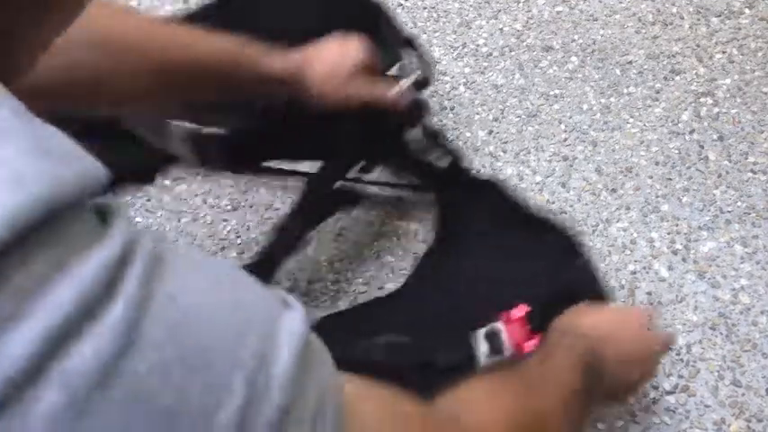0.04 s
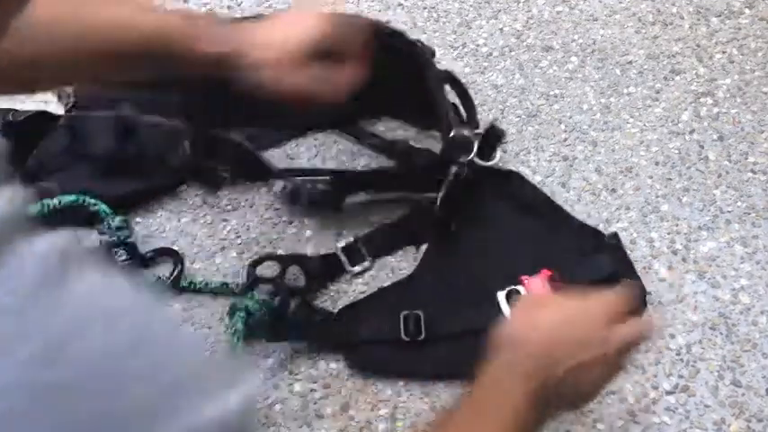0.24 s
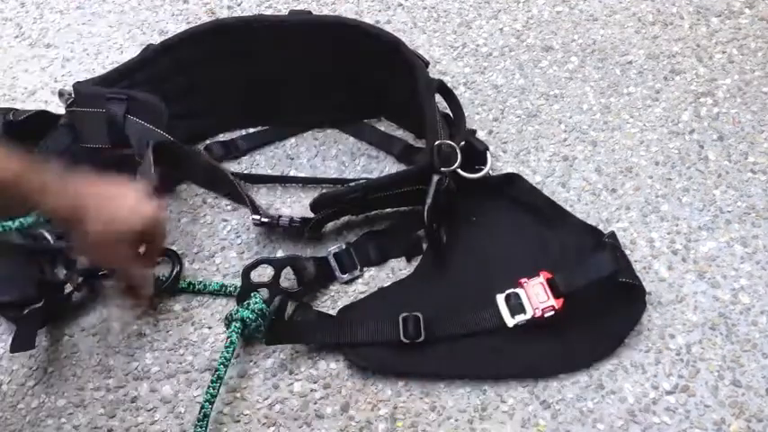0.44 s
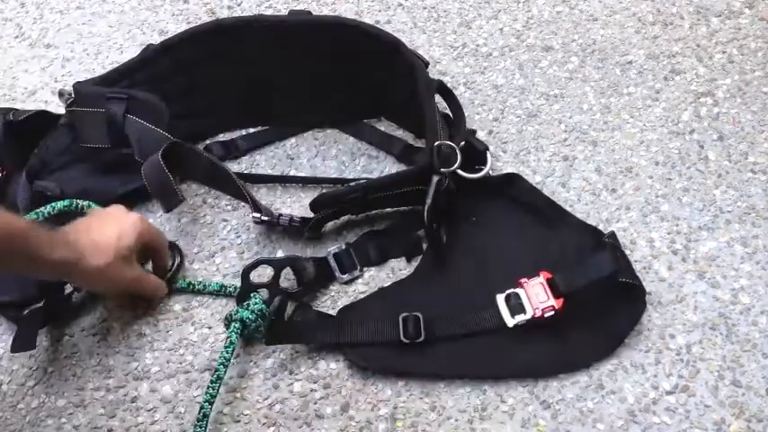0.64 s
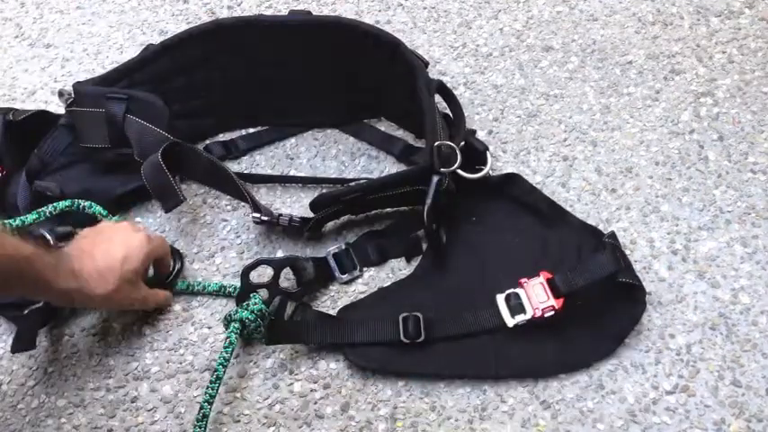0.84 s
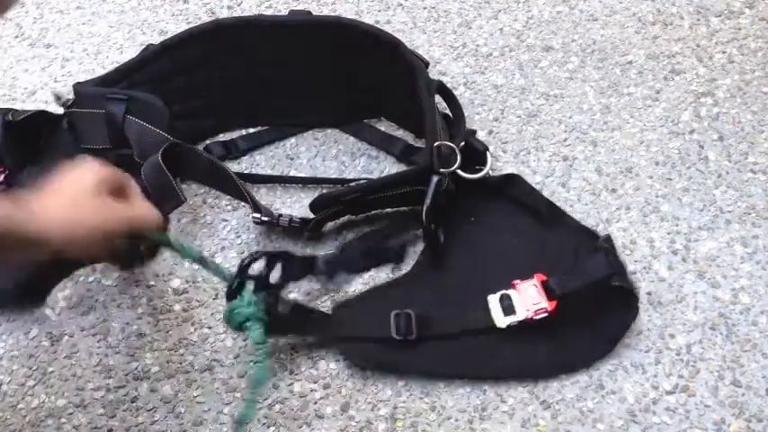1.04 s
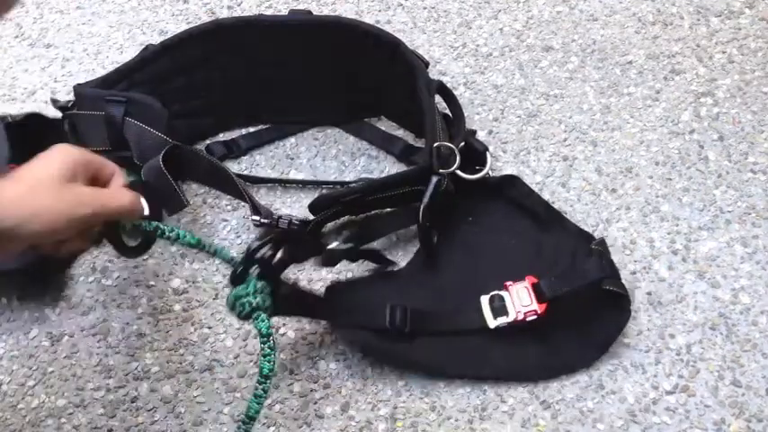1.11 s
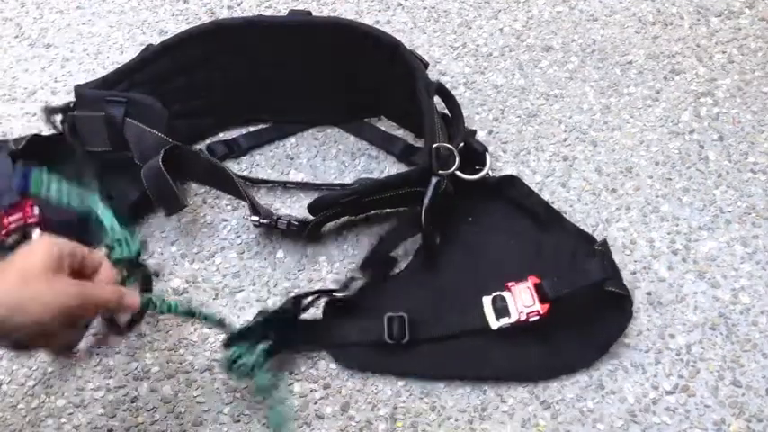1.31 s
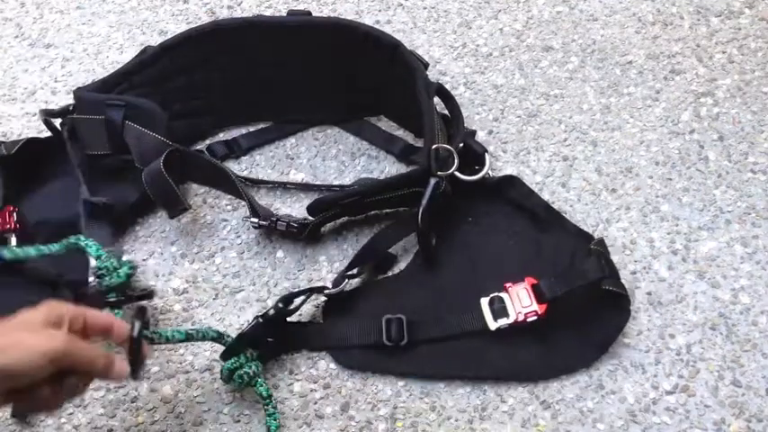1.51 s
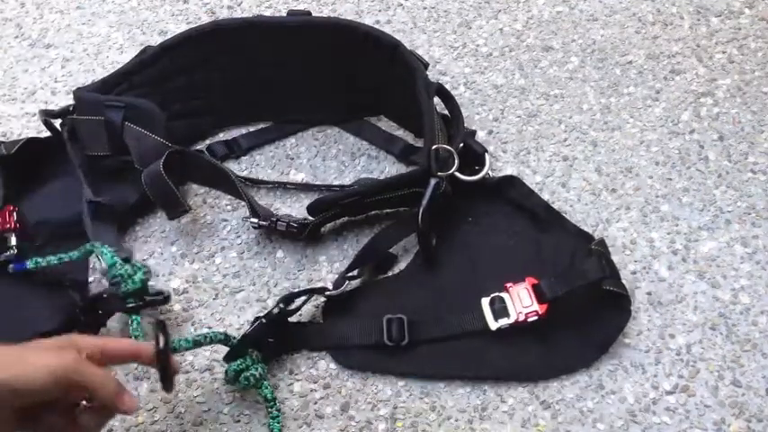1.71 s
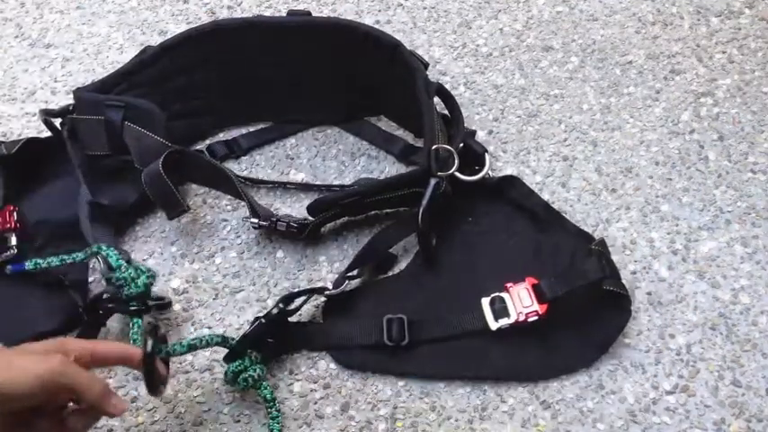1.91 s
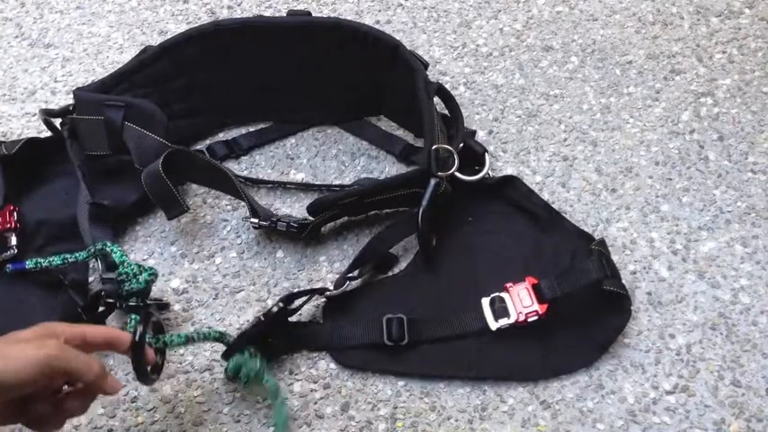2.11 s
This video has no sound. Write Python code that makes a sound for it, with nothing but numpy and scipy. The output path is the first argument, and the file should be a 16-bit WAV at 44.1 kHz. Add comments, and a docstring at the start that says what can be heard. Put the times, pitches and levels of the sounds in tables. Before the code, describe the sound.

Close-up harness hardware jingles and knocks on a hard outdoor slab while nylon webbing rustles, followed by a few short choked metal clicks, a soft thud, and one faint distant bird chirp near the end.

```python
"""Outdoors on a concrete slab, microphone close: a climbing harness is dropped and tugged about.
From the start, steady air noise and a low traffic rumble; metal rings clink as choked ringing modes and
nylon webbing rustles as pitched grains over hiss. Hardware soon knocks on the ground as noise bursts, from
dull to bright, then small links clatter as sprays of ringing taps; the slab answers with short dense echoes.
Near the end a distant bird chirps once, a raspy gliding whistle with a longer echo."""
import sys
import numpy as np
from scipy import signal
from scipy.fft import rfft, irfft
from scipy.io import wavfile
from scipy.ndimage import uniform_filter1d

SR = 44100
rng = np.random.default_rng(int(sys.argv[2]) if len(sys.argv) > 2 else 0)


def unload_audio(sound):
    """Save the sound as a 16-bit wav file, at the path given as the first command line argument."""
    columns = np.transpose(np.atleast_2d(sound))
    # keep every value between -1 and 1, then stretch to whole-number steps
    steps = np.round(np.clip(columns, -1, 1) * 32767)
    wavfile.write(sys.argv[1], SR, steps.astype(np.int16))


N = 94815  # samples in the scene


def gain_of(db):
    """Converts dB to an amplitude factor."""
    return 10 ** (np.asarray(db) / 20)


def evened(x):
    """Scales x to rms 1."""
    return x / np.sqrt(np.mean(x ** 2) + 1e-20)


def add(mix, s, sound):
    """Adds a sound into the mix from s seconds on, cut at the end of the mix."""
    part = mix[round(s * SR):][:len(sound)]
    part += sound[:len(part)]


def coloured(x, points):
    """Filters x by a spectrum given as (f/Hz, level/dB) points; rms 1."""
    f, db = np.transpose(points)
    hz = np.fft.rfftfreq(len(x), 1 / SR)
    curve_db = np.interp(np.log(hz + 1), np.log(f + 1), db, left=-60, right=-60)
    return evened(irfft(rfft(x) * gain_of(curve_db), len(x)))


def resonate(x, hz, width_hz):
    """Passes x through one resonance whose peak gain is 1."""
    b, a = signal.iirpeak(hz, hz / min(width_hz, SR / 3), SR)
    return signal.lfilter(b, a, x)


def crowd(clicks, lo_hz, hi_hz, sharp, count):
    """Rings each click at one of many pitches between lo and hi; rms 1."""
    which = rng.integers(0, count, len(clicks))
    pitches = np.geomspace(lo_hz, hi_hz, count)
    return evened(sum(resonate(clicks * (which == k), hz, hz / sharp) for k, hz in enumerate(pitches)))


def patchy(x, depth_db):
    """Raises and lowers small random patches of time and pitch; rms 1."""
    z = signal.stft(x, nperseg=256, noverlap=192)[2]
    field = rng.standard_normal(z.shape[::-1]).T
    field = uniform_filter1d(field, size=5, axis=0)  # over pitch
    field = uniform_filter1d(field, size=6, axis=1)  # over time
    patched = z * gain_of(depth_db * evened(field))
    return evened(signal.istft(patched, nperseg=256, noverlap=192)[1][:N])


def echoes(x, t60):
    """Adds up dense, exponentially decaying reflections of total energy 1."""
    t = np.arange(SR // 2) / SR
    tail = rng.standard_normal(len(t)) * gain_of(-60 * t / t60)
    return signal.fftconvolve(x, tail / np.linalg.norm(tail))[:N]


# Colour of the open air: f/Hz, relative level/dB
AIR_COLOUR = [(25, -16), (65, -4), (150, -6.5), (300, -14), (700, -23.5), (2000, -32.5), (15500, -39.5)]
AIR_DB = -66
RUMBLE_HZ, RUMBLE_WIDTH_HZ, RUMBLE_DB = 70, 16.3, -64


def outdoors():
    """Steady coloured air noise, and traffic rumble that wavers as narrow-band noise does."""
    air = coloured(rng.standard_normal(N), AIR_COLOUR)
    rumble = evened(resonate(rng.standard_normal(N), RUMBLE_HZ, RUMBLE_WIDTH_HZ))
    return gain_of(AIR_DB) * air + gain_of(RUMBLE_DB) * rumble


# Contacts between metal parts: t/s, then level/dB of five mode families (near 6.9 kHz; 5.5 kHz; 7.4 kHz;
# 4.4 and 8 kHz; 11-12 kHz), then ring length factor [ratio]
CONTACTS = [(.000, -67, -54.5, -64.5, -63, -56.5, 1.14), (.117, -34.5, -48, -53, -64, -64.5, 2.6),
            (0.153, -43, -43, -45.5, -56.5, -67, 0.41), (0.182, -45, -71, -51, -71, -86, 2.2),
            (0.206, -32.5, -40.5, -61, -65, -42, 1.7), (.220, -31.5, -37, -43, -51, -32.5, 3.8),
            (0.232, -29.5, -33.5, -53, -55, -35.5, 0.53), (0.261, -41, -42.5, -51, -55, -60, 0.67),
            (0.311, -43.5, -70, -55.5, -75, -70, 0.43), (0.639, -36.5, -29.5, -50, -46.5, -52, 0.1),
            (.652, -54.5, -51.5, -81, -65, -65.5, 1.21), (0.832, -46, -40.5, -60, -79, -56, 0.62),
            (0.851, -60, -54.5, -70, -78, -78, 1.3), (0.971, -29.5, -54, -78, -69, -90, 0.13),
            (0.984, -36.5, -88, -93, -88, -86, 0.13)]
# Modes of rings and buckles, one list per family: level/dB within family, t60/s before the ring length factor
METAL_MODES = [
    [(2.5, 0.21), (-9, 0.083), (-22, 0.21), (-12.5, 0.13)],
    [(-14.5, 0.39), (-3, 0.14), (-8, 0.19)],
    [(5.5, 0.71)],
    [(5, 0.2), (5.5, 0.19)],
    [(-3, 0.14), (-10, 0.15), (-0.5, 0.1)],
]
# Pitches of the same modes, one list per family: f/Hz
METAL_PITCHES = [
    [6886, 6815, 6972, 6625],
    [5453, 5522, 5596],
    [7434],
    [7973, 4366],
    [11025, 11071, 12110],
]
STRIKE_S, CHOKE_S = 0.0016, 0.0014  # time constants of onset and choking
MODE_SPREAD_DB = 3.0  # random spread of the modes listed below 0 dB
RATTLE, RATTLE_S = 0.45, 0.008  # depth and averaging time of the ring's roughness


def clinks():
    """Each contact sets the modes ringing until the next contact chokes them; damped rings are rougher."""
    out, t = np.zeros(N), np.arange(SR // 4) / SR
    hz = np.concatenate(METAL_PITCHES)[:, None]
    mode_db, t60 = np.concatenate(METAL_MODES).T[:, :, None]
    family = np.repeat(np.arange(len(METAL_MODES)), [len(modes) for modes in METAL_MODES])
    for contact, following in zip(CONTACTS, CONTACTS[1:] + [(np.inf,)]):
        start, length = contact[0], contact[6]
        uneven, phase = rng.standard_normal(hz.shape), 2 * np.pi * rng.random(hz.shape)
        level_db = np.array(contact[1:6])[family, None] + mode_db + MODE_SPREAD_DB * uneven * (mode_db < 0)
        wander = uniform_filter1d(rng.standard_normal((2, len(hz), len(t))), round(RATTLE_S * SR), axis=2)
        # the root undoes the loss of level from averaging
        in_phase, across = wander * np.sqrt(RATTLE_S * SR) * RATTLE / (1 + length ** 2)
        turn = 2 * np.pi * hz * t + phase
        rough = (1 + in_phase) * np.sin(turn) + across * np.cos(turn)
        ring = gain_of(level_db - 60 * t / (t60 * abs(length))) * rough
        choke = np.exp(-np.maximum(t - (following[0] - start), 0) / CHOKE_S)
        add(out, start, (1 - np.exp(-t / STRIKE_S)) * choke * ring.sum(0))
    return out


# Handling of the webbing: t/s, low rustle level/dB, bright rustle level/dB
HANDLING = [(0, -59.5, -68.5), (0.102, -58, -57.5), (0.263, -64, -60.5), (0.291, -56, -47.5),
            (0.333, -73, -63), (0.382, -56.5, -50.5), (0.43, -57.5, -47.5), (0.469, -73, -67.5),
            (0.551, -68, -65.5), (.59, -75.5, -78.5), (.73, -76.5, -89), (.76, -70, -73.5),
            (1.03, -69.5, -78.5), (1.07, -66, -76.5), (1.148, -64.5, -77.5), (1.188, -67.5, -79.5),
            (1.441, -74, -81.5), (1.47, -73, -65.5), (1.551, -82.5, -99), (1.84, -82.5, -73),
            (2.05, -64.5, -89), (2.15, -75, -99)]
# Colour of the low rustle: f/Hz, relative level/dB
LOW_COLOUR = [(200, -6.5), (450, -3.5), (900, 0.5), (1600, -2), (3200, -10), (7000, -21)]
# Colour of the bright rustle: f/Hz, relative level/dB
BRIGHT_COLOUR = [(1500, -13), (3000, 9.5), (5000, 5), (6600, 9.5), (10300, 2.5), (15500, -3)]
GRAINS_PER_S, GRAIN_DB, GRAIN_SHARE = 1200, 3, 0.57  # rate, mean size above smallest, share against hiss
GRAIN_SHARP = 5.5  # pitch over width of one grain's ring
PATCH_DB = 1  # short tight clumps of creasing


def webbing():
    """Stiff weave slips in short pitched grains of uneven size over a hiss, in a low and a bright part."""
    s, low_db, bright_db = np.transpose(HANDLING)
    t, out = np.arange(N) / SR, 0
    for level_db, colour in ((low_db, LOW_COLOUR), (bright_db, BRIGHT_COLOUR)):
        size = gain_of(GRAIN_DB * np.minimum(rng.exponential(1, N), 5))
        slips = size * (rng.random(N) < GRAINS_PER_S / SR)
        grains = crowd(slips, colour[0][0], colour[-1][0], GRAIN_SHARP, count=16)
        drive = GRAIN_SHARE * grains + (1 - GRAIN_SHARE) * rng.standard_normal(N)
        rustle = patchy(coloured(drive, colour), PATCH_DB)
        out = out + rustle * gain_of(np.interp(t, s, level_db))
    return out


# Hardware and rope knocking on the ground: t/s, level/dB, f/Hz, sharpness [pitch over width], t60/s
GROUND_KNOCKS = [(0.021, -43, 2220, 0.64, 0.01), (.094, -49.5, 630, 1.5, 0.21),
                 (0.157, -43.5, 1610, 1.6, 0.017), (0.286, -39, 3660, 5.5, 0.0095),
                 (0.285, -39, 10150, 6.6, 0.081), (0.346, -47, 3240, 7.2, 0.017),
                 (0.362, -48, 3430, 4, 0.014), (0.417, -39.5, 2880, 6.9, 0.018),
                 (0.832, -45, 2700, 1, 0.0042), (0.972, -37, 1980, 0.79, 0.0047),
                 (0.982, -48.5, 2200, 1.1, 0.0077), (1.245, -50.5, 944, 1.05, 0.12),
                 (1.959, -57.5, 1570, 9.8, 0.019), (2.03, -50, 1030, 0.71, 0.12)]
RISE_SHARE = 0.033  # rise time as a share of t60


def knocks():
    """A fading burst of noise through a double resonance, broad or narrow; longer knocks rise more slowly."""
    out, t = np.zeros(N), np.arange(SR // 5) / SR
    noises = rng.standard_normal((len(GROUND_KNOCKS), len(t)))
    for (s, db, hz, sharp, t60), noise in zip(GROUND_KNOCKS, noises):
        fade = gain_of(-60 * t / abs(t60))
        rise = np.minimum(t / abs(RISE_SHARE * t60), 1)
        body = resonate(resonate(noise, hz, hz / sharp), hz, 2 * hz / sharp) * fade
        body = body * np.linalg.norm(fade) / np.linalg.norm(body)  # same energy as the bare fade
        add(out, s, gain_of(db) * rise * body)
    return out


# Small buckles and links clattering: t/s, level/dB, t60/s
CLATTERS = [(.208, -52, .06), (0.218, -51.5, 0.24), (.639, -41, 0.032), (0.65, -62, 0.46),
            (0.832, -53, 0.11)]
LINK_LOW_HZ, LINK_HIGH_HZ, TAPS_PER_S = 1870, 8280, 3600
LINK_SHARP = (LINK_LOW_HZ + LINK_HIGH_HZ) / 2 / 56  # pitch over width: 56 Hz wide at the mean pitch


def clatter():
    """A quick fading spray of tiny taps after a blow, each ringing one of many small parts."""
    out, t = np.zeros(N), np.arange(SR // 5) / SR
    for s, db, t60 in CLATTERS:
        taps = rng.standard_normal(len(t)) * (rng.random(len(t)) < TAPS_PER_S / SR)
        links = crowd(taps, LINK_LOW_HZ, LINK_HIGH_HZ, LINK_SHARP, count=40)
        add(out, s, gain_of(db - 60 * t / abs(t60)) * links)
    return out


# The distant bird's one chirp: t/s, f/Hz, level/dB before rasp and echo
BIRD_CHIRP = [(1.838, 4370, -67), (1.855, 3516, -62.5), (1.868, 3530, -65), (1.877, 3880, -59.5),
              (1.892, 3540, -83)]
RASP = 0.37  # depth of the random flutter in level
YARD_T60, YARD_DB = 0.3, 0.5  # echo time in s, echo level against the direct call


def bird():
    """A raspy whistle that falls, lifts briefly and falls again, smeared by the echoes of the yard."""
    s, hz, db = np.transpose(BIRD_CHIRP)
    t = np.arange(N) / SR
    phase = 2 * np.pi * np.cumsum(np.interp(t, s, hz)) / SR
    level = gain_of(np.interp(t, s, db, left=-200, right=-200))
    flutter = evened(uniform_filter1d(rng.standard_normal(N), size=40))
    call = np.sqrt(2) * np.sin(phase) * level * (1 + RASP * flutter)
    return call + gain_of(YARD_DB) * echoes(call, YARD_T60)


SLAB_T60, SLAB_DB = 0.14, -9.5  # echo time in s, echo level against the direct sound


def scene():
    """The harness close by with the slab's echoes, the distant bird and the outdoor bed; one channel."""
    near = clinks() + clatter() + knocks() + webbing()
    slab = gain_of(SLAB_DB) * echoes(near, SLAB_T60)
    return (near + slab + bird() + outdoors())[None]


EDGE_HZ = 15450


def record(dry):
    """The upper band limit of the microphone chain, a steep low-pass."""
    low_pass = signal.firwin(511, EDGE_HZ, window=("kaiser", 9), fs=SR)
    return signal.oaconvolve(dry, low_pass[None], "same")


dry = scene()
out = record(dry)
unload_audio(out)
```